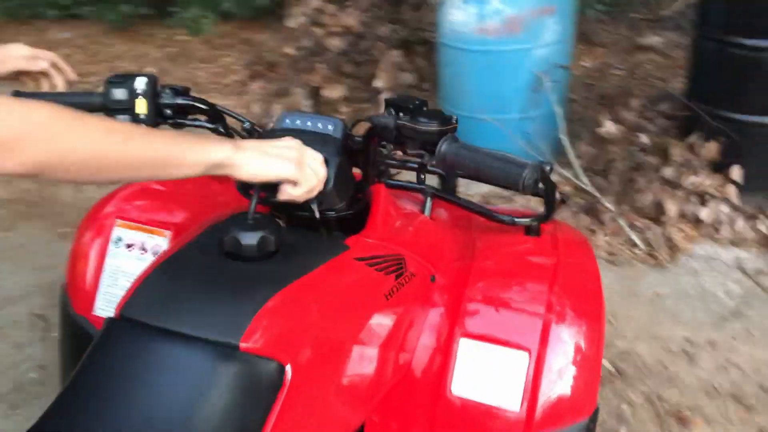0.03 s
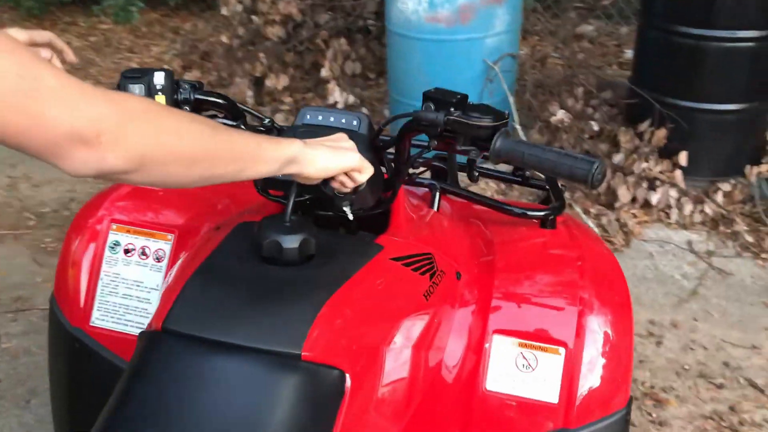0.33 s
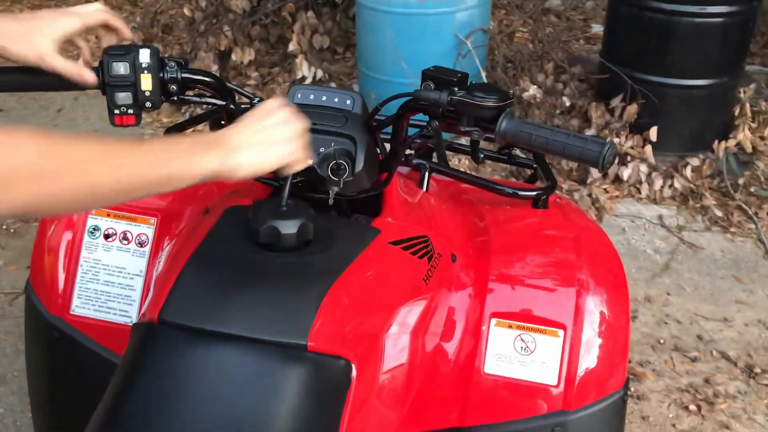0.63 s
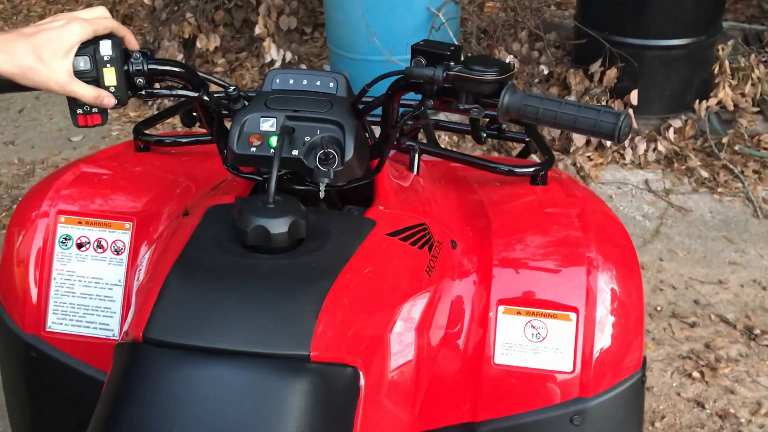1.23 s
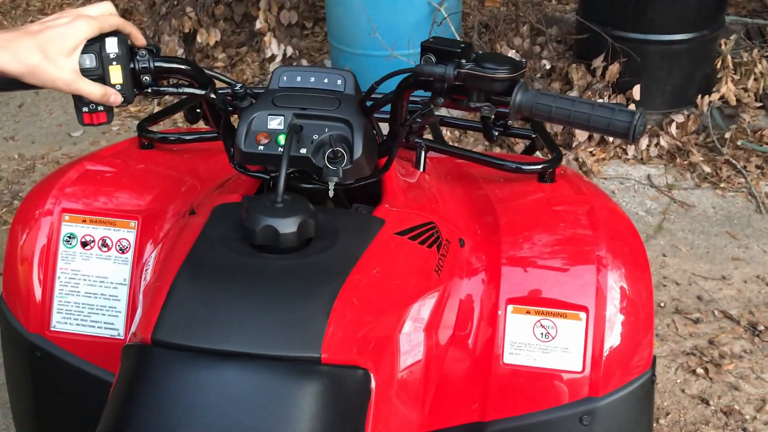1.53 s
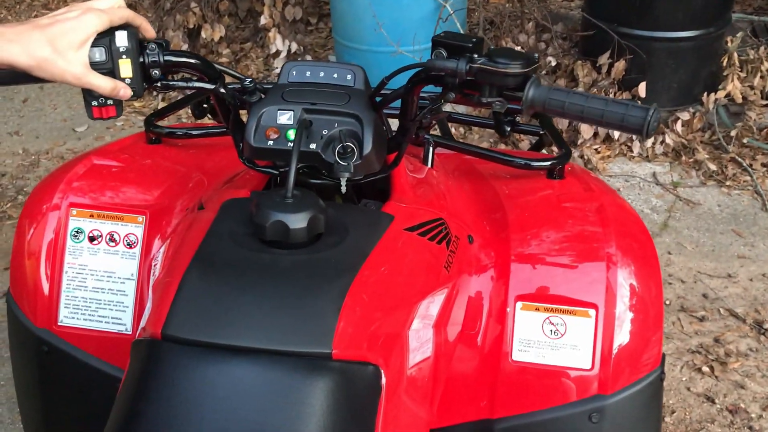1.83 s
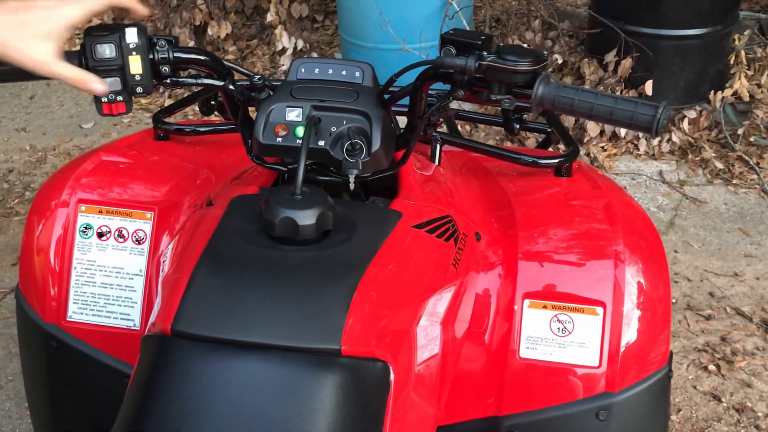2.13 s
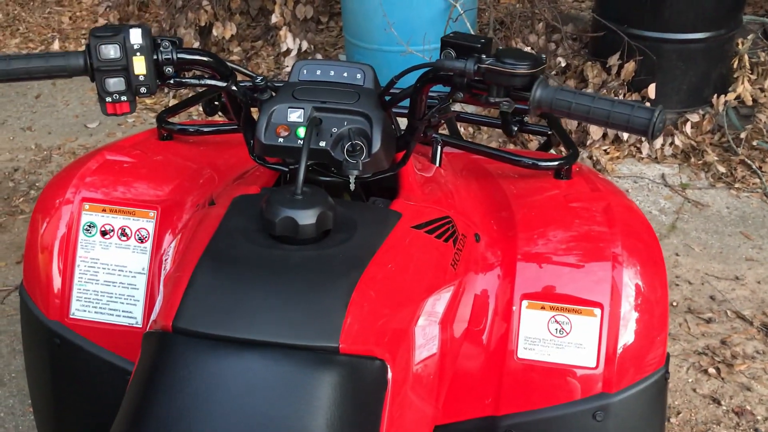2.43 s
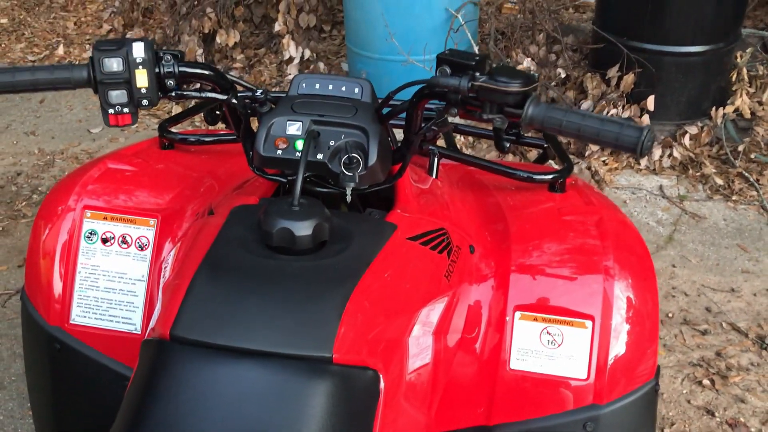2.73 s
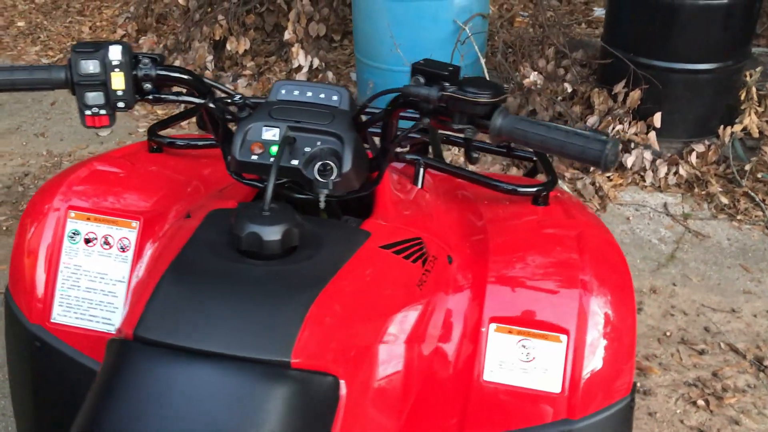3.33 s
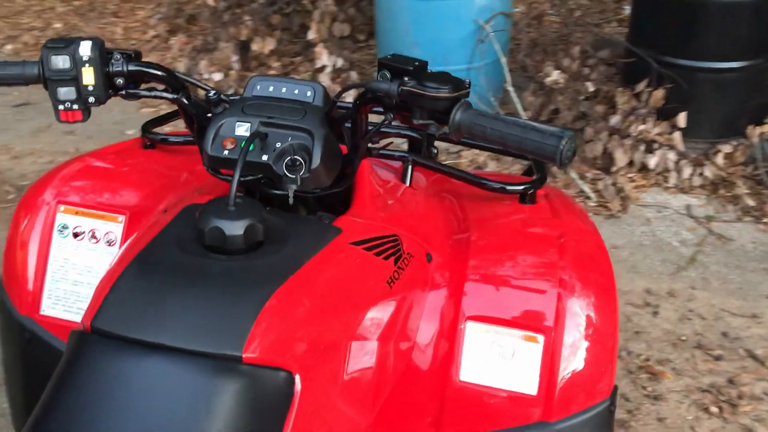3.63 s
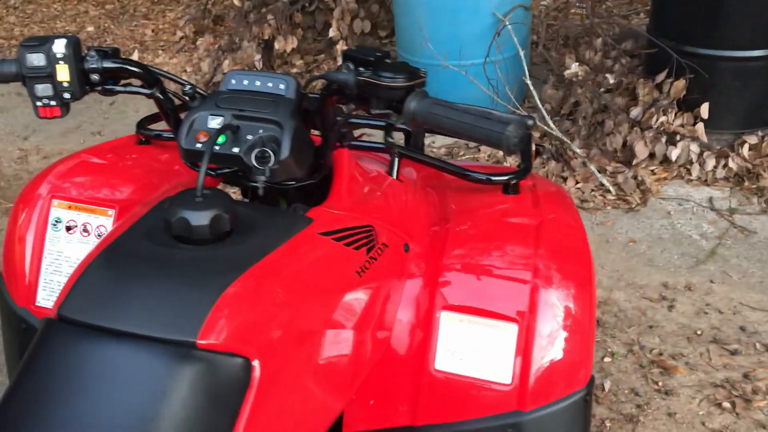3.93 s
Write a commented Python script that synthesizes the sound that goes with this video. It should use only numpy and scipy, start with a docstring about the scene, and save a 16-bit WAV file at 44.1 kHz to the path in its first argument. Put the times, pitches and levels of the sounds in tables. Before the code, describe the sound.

A quad bike engine is started over faint outdoor air. First comes a key click, then a clack and a short, squealing crank of the starter, before the engine fires and settles into a regular, lightly ticking idle.

```python
"""Over faint outdoor air, a key scrapes in the ignition lock of a quad bike and clicks round. The solenoid
clacks and the starter grinds the single cylinder over two compressions, its drive squealing. The engine
catches and idles at about ten chugs a second, each firing ringing pipe, silencer and block, while the
starter spins down. Only the left channel carries sound."""
import sys
import numpy as np
from scipy import signal
from scipy.fft import rfft, irfft
from scipy.io import wavfile

SR = 44100
rng = np.random.default_rng(int(sys.argv[2]) if len(sys.argv) > 2 else 0)


def put_to_file(sound):
    """Save the sound as 16-bit audio at rate SR, in the file named by the first command-line argument."""
    columns = np.atleast_2d(sound).T  # one column per channel
    safe = np.clip(columns, -1, 1)
    whole_steps = np.round(safe * 32767)
    wavfile.write(sys.argv[1], SR, whole_steps.astype(np.int16))


N = 176400
T = np.arange(N) / SR


def from_db(db):
    """Decibels to gain."""
    return 10 ** (np.asarray(db) / 20)


def rms_one(x):
    """Scale to unit power."""
    return x / np.sqrt(np.mean(x ** 2) + 1e-20)


def curve(rows):
    """Join (s, value) points."""
    return np.interp(T, *np.transpose(rows))


def white():
    """White noise."""
    return rng.standard_normal(N)


def tone(hz):
    """Sine following a pitch."""
    return np.sin(2 * np.pi * np.cumsum(hz) / SR)


def colour(x, spectrum):
    """Shape x by (Hz, dB) points; unit power."""
    hz, db = np.transpose(spectrum)
    f = np.maximum(np.arange(N // 2 + 1) * SR / N, 1)
    gain = from_db(np.interp(np.log(f), np.log(hz), db))
    low_cut = np.minimum(f / hz[0], 1) ** 2
    return rms_one(irfft(rfft(x) * gain * low_cut, N))


def drift(hz):
    """Low-passed noise; unit power."""
    return rms_one(signal.sosfilt(signal.butter(2, hz, fs=SR, output="sos"), white()))


def band(x, low_hz, high_hz, order):
    """Band-pass filter."""
    return signal.sosfilt(signal.butter(order, [low_hz, high_hz], "band", fs=SR, output="sos"), x + 1e-18)


def resonate(x, modes, order):
    """Parallel (Hz, width Hz, dB) bands of alternating sign."""
    return sum((-1) ** k * from_db(db) * band(x, hz - width / 2, hz + width / 2, order)
               for k, (hz, width, db) in enumerate(modes))


def body(x, modes):
    """Two-pole resonances; unit power."""
    return rms_one(resonate(x, modes, order=1))


def clicks(rows, vary_db=0):
    """One impulse per (s, dB)."""
    s, db = np.transpose(rows)
    return np.bincount((s * SR).astype(int), from_db(db + vary_db * rng.standard_normal(len(s))), N)[:N]


def bursts(rows, attack_s, hold_s, t60_s):
    """One attack, hold and release per (s, dB)."""
    t = T[:SR // 2]
    shape = np.minimum(t / attack_s, 1) * from_db(-60 * np.maximum(t - hold_s, 0) / t60_s)
    return signal.fftconvolve(clicks(rows), shape)[:N]


def swells(rows):
    """One bell of gain per (s, dB, sigma s)."""
    return sum(from_db(db) * np.exp(-.5 * ((T - s) / sigma) ** 2) for s, db, sigma in rows)


def grains(per_s, spread_db):
    """Dense contacts of uneven size."""
    hits = rng.random(N) < per_s / SR
    return hits * from_db(spread_db * np.minimum(rng.exponential(1, N), 4)) * rng.choice([-1, 1], N)


# Background spectrum. Each row: frequency in Hz, relative level in dB.
AIR = [(25, -50.5), (59, 1), (92, -12.5), (123, -9), (200, -23), (242, -18.5), (516, -20.5), (624, -16),
       (796, -18), (962, -23), (1560, -34), (16000, -62.5)]

def outdoor_air():
    """Steady low noise with a faint, thin whistle."""
    return from_db(-41.5) * colour(white(), AIR) + from_db(-84) * body(white(), [(11700, 160, 0)])


# Key slides. Each row: start in seconds, level in dB, hold in seconds.
FUMBLES = [(0.081, -54, 0.0036), (0.17, -51, 0.019), (0.2, -48, 0.016), (0.353, -47.5, 0.0043),
           (0.366, -52.5, 0.035), (0.555, -55.5, 0.031)]
# Scrape and snap spectra. Each row: frequency in Hz, relative level in dB.
SCRAPE = [(1000, 0.5), (1900, 1), (3400, -0.5), (6000, -12), (9000, -19.5), (15000, -23)]
SNAP = [(350, -39.5), (600, -24), (790, 3), (1040, -16), (1310, -1), (1830, 0), (3630, -9), (4050, -7),
        (5120, -11.5), (8740, -4.5), (10300, -7), (13000, -5), (16000, -9.5)]

def key(turn_s=.4152):
    """The key scrapes in the lock and snaps over its detent; its ring ticks."""
    slides = sum(bursts([(s, db)], .0024, hold_s, .08) for s, db, hold_s in FUMBLES)
    snap = bursts([(turn_s, -19.5)], .000071, .0033, .014)
    tail = bursts([(turn_s, -37.5)], .0027, .0033, .18)
    ring = bursts([(.605, -56.5)], .00084, .0012, .079) * rms_one(band(white(), 6500, 15000, order=2))
    return (snap + tail) * colour(white(), SNAP) + slides * colour(grains(3000, 2.8), SCRAPE) + ring


# Plunger strike and bounce. Each row: start in seconds, level in dB.
CLACKS = [(1.4855, -0.5), (1.490, -14)]
# Plunger rattle. Each row: centre in Hz, width in Hz, relative level in dB.
PLUNGER = [(4620, 230, 2.5), (8050, 1040, -8)]
# Casing modes. Each row: frequency in Hz, level in dB, T60 in seconds.
CASING = [(238, -24, 0.11), (944, -37, 0.094), (1290, -30, .05), (2890, -30, 0.045), (4960, -37, .04),
          (5460, -22, 0.03), (7250, -29, 0.053)]
# Metal noise, shared with the starter gear. Each row: frequency in Hz, relative level in dB.
GRIND = [(180, -20), (300, -0.5), (502, -39), (856, 1.5), (1340, -6), (1720, -1.5), (2790, -19),
         (3520, -8.5), (7440, -19.5), (8360, -11), (16000, -40)]

def solenoid():
    """The plunger snaps shut, bounces and rings the casing."""
    out = from_db(-32.5) * colour(white(), GRIND) * bursts(CLACKS, .00069, .0042, .15)
    out += from_db(-20) * body(white(), PLUNGER) * bursts(CLACKS, .00075, .002, .02)
    strikes = clicks(CLACKS) + 1e-18
    for hz, db, t60_s in CASING:
        r, w = from_db(-60 / (t60_s * SR)), 2 * np.pi * hz / SR  # pole radius and angle
        out += from_db(db) * signal.lfilter([0, np.sin(w)], [1, -2 * r * np.cos(w), r * r], strikes)
    return out


# Clatter spectrum. Each row: frequency in Hz, relative level in dB.
CLATTER = [(180, 1.5), (300, -7.5), (478, -13), (634, -33), (856, -8.5), (1460, -17.5), (1780, -24),
           (2480, -25), (4830, -29), (5700, -29), (10400, -39.5), (14000, -40), (16000, -40)]

def chain():
    """Chain and valve gear clatter from the solenoid's strike onward."""
    contacts = grains(per_s=2500, spread_db=4.5) + 1.05 * white()
    fade_in = np.clip((T - CLACKS[0][0]) / .066, 0, 1)
    return from_db(-41) * colour(contacts, CLATTER) * fade_in


# Strain against the piston. Each row: peak time in seconds, level in dB, sigma in seconds.
SURGES = [(1.549, -28, 0.023), (1.641, -33.5, .014), (1.703, -31, 0.019), (1.777, -27, 0.0054),
          (1.799, -40, 0.0076)]

def starter_load(start_s=1.495):
    """Gain of the gear noise: steady drag plus surges."""
    drag = bursts([(start_s, -45.5)], attack_s=.014, hold_s=.323, t60_s=.31)
    return drag + swells(SURGES) * (T > start_s)


# Gear speed. Each row: time in seconds, tooth rate in Hz.
TOOTH_RATE = [(1.51, 362.8), (1.536, 413.8), (1.556, 428.2), (1.61, 432), (1.632, 396.8), (1.68, 438.4),
              (1.708, 433.8), (1.75, 430), (1.77, 444), (1.81, 444)]
# Starter housing modes. Each row: centre in Hz, width in Hz, relative level in dB.
HOUSING = [(922, 170, -5), (1110, 73, 1.5), (1793, 45, 6), (2220, 120, -8), (2529, 54, -3),
           (3380, 260, -22)]
# Gear whine. Each row: multiple of the tooth rate, relative level in dB.
MESH = [(2, -2.5), (3, -17), (4, -6.5), (5, -9), (6, -16), (8, -8.5), (12, -16)]

def starter_gear(jitter=.021, wobble=.012, flutter_db=3.5):
    """Teeth strike the housing, grind and sing, harder against each compression."""
    phase = np.cumsum(curve(TOOTH_RATE) * (1 + jitter * drift(300))) / SR
    strikes = np.diff(np.floor(phase), prepend=0) * from_db(3 * white())
    housing = from_db(3.5) * body(strikes, HOUSING)
    grind = from_db(-2.5) * colour(white(), GRIND) * (1 + .5 * np.cos(2 * np.pi * phase))
    mesh_hz = curve(TOOTH_RATE) * (1 + wobble * drift(103))
    whine = sum(from_db(db + flutter_db * drift(62)) * tone(k * mesh_hz) for k, db in MESH)
    return starter_load() * (housing + grind + whine)


# Brush envelope. Each row: time in seconds, level in dB.
BRUSH_LEVEL = [(1.5, -46), (1.56, -40), (1.71, -35), (1.76, -40), (1.95, -47.5), (2.3, -46.5), (2.7, -54),
               (3.1, -109)]
# Brush and whine spectra. Each row: frequency in Hz, relative level in dB.
BRUSHES = [(2000, 11), (4000, 7.5), (6000, 5.5), (8800, 2), (10400, -7), (12000, -4), (13200, 2.5),
           (16000, -10)]
WHINE = [(1400, -16), (3600, -2), (5500, 5.5), (7000, -7), (10400, -12), (12000, 1), (14500, -1)]
# Freewheeling whine. Each row: time in seconds, pitch in Hz.
SPIN_DOWN = [(1.8, 6400), (1.91, 7360), (2.05, 6130), (2.25, 4300), (2.5, 2580), (2.72, 1345)]

def starter_motor(hum_hz=210, flutter_db=6):
    """Brushes hiss; the motor hums under load, then freewheels down with a thin, broken whine."""
    brushes = colour(white(), BRUSHES) + from_db(-10.5) * body(white(), [(11890, 160, 0)])
    brushes *= from_db(curve(BRUSH_LEVEL)) * (T > BRUSH_LEVEL[0][0])
    hum = tone(hum_hz + 4 * drift(18)) * bursts([(1.66, -36)], .013, .16, .1)
    spin_hz = curve(SPIN_DOWN) + 70 * drift(457)
    whine = colour(tone(spin_hz) + tone(2 * spin_hz), WHINE) * from_db(flutter_db * drift(29))
    whine *= swells([(2.25, -58, .45)]) * (T > SPIN_DOWN[0][0])
    return brushes + hum + whine


def silencer_boom(start_s, db, pitch, low_hz=45.5, high_hz=98.8, sag_s=.022):
    """The silencer swells and dies away, drooping in pitch as the gas slows."""
    t = T[:SR // 4]
    hz = pitch * (low_hz + (high_hz - low_hz) * np.exp(-t / sag_s))
    attack = np.sqrt(np.minimum(t / .012, 1))
    release = from_db(-60 * np.maximum(t - .034, 0) / .071)
    return np.pad(from_db(db - 14) * attack * release * tone(hz), (int(start_s * SR), N))[:N]


# Squeal glide. Each row: time in seconds, pitch in Hz.
SQUEAL_PITCH = [(1.62, 9040), (1.645, 8020), (1.68, 8750), (1.705, 8550), (1.755, 8450), (1.768, 9313),
                (1.785, 8580), (1.82, 8900)]
# Squeals. Each row: peak time in seconds, relative level in dB, sigma in seconds.
SQUEALS = [(1.629, -37.5, 0.0031), (1.645, -33, 0.0027), (1.701, -29, 0.0057), (1.708, -35.5, 0.019),
           (1.775, -26.5, 0.0026), (1.785, -28, 0.0018), (1.792, -44.5, 0.014)]
# Rasp spectrum. Each row: frequency in Hz, relative level in dB.
RASP = [(3000, -48), (5200, 1), (6500, 7.5), (8200, -5), (9400, -1), (10500, -3), (13000, -2), (16000, -24)]
# Drive slips. Each row: start in seconds, level in dB.
SLIPS = [(1.623, -36.5), (1.641, -39), (1.682, -33), (1.716, -37), (1.766, -34.5)]

def starter_drive(wander_hz=132, roughness=.24):
    """The drive squeals and rasps as it slips."""
    hz = curve(SQUEAL_PITCH) + wander_hz * drift(1000)
    squeal = rms_one(tone(hz) * (1 + roughness * drift(370)))
    rasp = colour(grains(3300, 1.6), RASP) * bursts(SLIPS, .00096, .014, .14)
    return from_db(7) * swells(SQUEALS) * squeal + rasp


# Cylinder firings. Each row: start in seconds, relative level in dB.
FIRINGS = [(1.8053, 3.5), (1.881, 3.5), (1.961, -2.5), (2.051, 0.5), (2.1426, 1), (2.2445, -0.5),
           (2.3425, 0.5), (2.442, 1), (2.539, 1), (2.6427, 0), (2.7334, 1.5), (2.831, 0), (2.9335, -1),
           (3.0276, 0), (3.1319, -1), (3.2222, 1), (3.317, 0), (3.4112, 0), (3.5012, 0), (3.596, 1),
           (3.6989, 0), (3.7891, 0.5), (3.8805, -0.5), (3.97, 1.5)]
FIRING_S = np.array(FIRINGS)[:, 0]
# Exhaust pipe modes. Each row: centre in Hz, width in Hz, gain in dB.
PIPE = [(128.2, 21.6, 31.5), (198.2, 34, 24), (245.4, 16.8, 23), (275, 19, 25.5), (333, 32, 7.5)]
# Turbulence spectrum. Each row: frequency in Hz, relative level in dB.
GAS = [(52, -8), (100, -3), (160, -19.5), (280, -9.5), (450, -23), (700, -28), (1500, -51)]

def exhaust(puff_delay_s=.003, puff_width_s=.0014):
    """After one unfired gulp, each firing puffs, rings pipe and silencer and trails turbulent gas."""
    gulp = silencer_boom(1.615, db=-9, pitch=.89)
    booms = sum(silencer_boom(s, db, pitch=rng.normal(1, .04)) for s, db in FIRINGS)
    silencer = signal.sosfilt(signal.butter(2, 36, "high", fs=SR, output="sos"), gulp + booms)
    pipe = resonate(clicks(FIRINGS, vary_db=.5), PIPE, order=2)
    t = T[:SR // 50]
    u = (t - puff_delay_s) / puff_width_s
    pulse = (1 - u * u) * np.exp(-.5 * u * u) * np.minimum(t / puff_width_s, 1)
    puffs = signal.fftconvolve(clicks(FIRINGS), pulse)[:N]
    puffs = signal.lfilter(*signal.butter(1, 30, "high", fs=SR), puffs)
    gas = colour(white(), GAS) * bursts(FIRINGS, .0014, .03, .13)
    return silencer + pipe + from_db(-16) * puffs + from_db(-31) * gas


# Block modes. Each row: centre in Hz, width in Hz, relative level in dB.
BLOCK = [(872, 48, 6), (772, 147, -3), (1047, 24, -2.5), (1235, 73, -4), (1464, 79, -11), (1735, 52, -2),
         (1898, 47, -14), (2290, 17, -7), (2457, 55, -12)]
# Firing hiss and jolt spectra. Each row: frequency in Hz, relative level in dB.
SPIT = [(2000, 8), (5000, 4), (8600, 0.5), (10300, -5.5), (11800, 5), (14000, -12), (16000, 2)]
JOLT = [(100, -7), (250, 16.5), (500, 1), (900, 3.5), (1800, -1.5), (3000, -8), (9000, -17), (16000, -18)]

def engine_block(spit_lead_s=.0028):
    """The block jolts twice as the engine catches, and rattles and hisses at each firing."""
    jolts = colour(white(), JOLT) * bursts([(1.8095, -24.5), (1.9335, -25.5)], .00026, .0039, .054)
    knock = from_db(-41.5) * body(grains(3000, .96), BLOCK) * bursts(FIRINGS, .00068, .036, .26)
    spit = colour(white(), SPIT) * bursts([(s - spit_lead_s, -45) for s in FIRING_S], .0027, .015, .091)
    return jolts + knock + spit


# Valve tick and cylinder head modes. Each row: centre in Hz, width in Hz, relative level in dB.
TICK = [(11670, 320, -1.5), (13400, 420, 3), (14500, 600, -4)]
HEAD = [(1913, 51, 11), (2070, 105, 7), (3210, 40, 2.5), (5710, 104, -0.5), (7020, 57, -5)]
# Tappet spectrum. Each row: frequency in Hz, relative level in dB.
TAPPETS = [(1500, 0), (2300, 11.5), (3200, 8.5), (4300, 5.5), (5700, -8), (7500, -4), (15000, -28)]

def valve_gear(tick_lead_s=.0055, knock_delay_s=.0071, seat_fractions=(.577, .708), vary_db=2.5):
    """Valves tick before each firing, rattle the head hardest just after it and seat in between."""
    leads = [(s - tick_lead_s, rng.normal(-47.5, vary_db)) for s in FIRING_S]
    ticks = body(white(), TICK) * bursts(leads, .0033, .0068, .057)
    knocks = bursts([(s + knock_delay_s, -47.5) for s in FIRING_S], .0027, .014, .063)
    head = body(grains(2500, 1), HEAD) * (knocks + from_db(-52) * (T > FIRING_S[0]))
    seats = [(s + fraction * cycle_s, rng.normal(-50.5, vary_db))
             for s, cycle_s in zip(FIRING_S, np.diff(FIRING_S)) for fraction in seat_fractions]
    tappets = colour(white(), TAPPETS) * bursts(seats, .0019, .0032, .07)
    return ticks + head + tappets


def scene():
    """All sources on the left; the right is silent."""
    left = outdoor_air() + key() + solenoid() + chain()
    left += starter_gear() + starter_motor() + starter_drive()
    left += exhaust() + engine_block() + valve_gear()
    return np.array([left, np.zeros(N)])


def record(dry, cutoff_hz=15900):
    """Steep low-pass."""
    return signal.sosfilt(signal.ellip(10, .2, 80, cutoff_hz, fs=SR, output="sos"), dry)


dry = scene()
out = record(dry)
put_to_file(out)
```